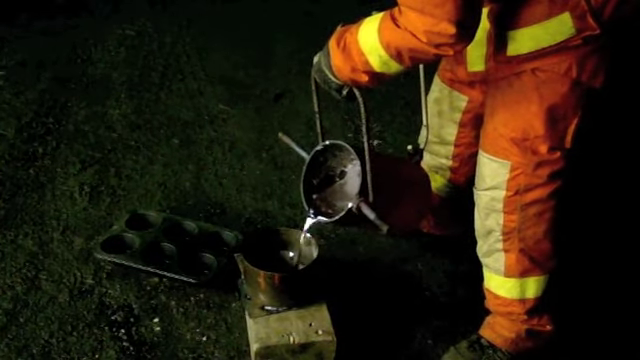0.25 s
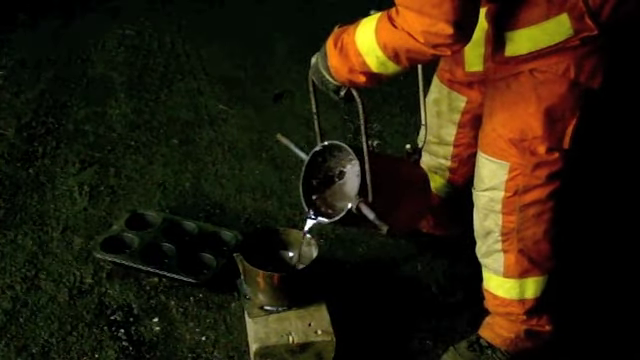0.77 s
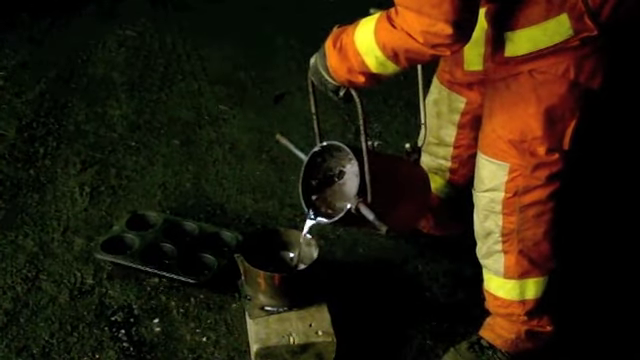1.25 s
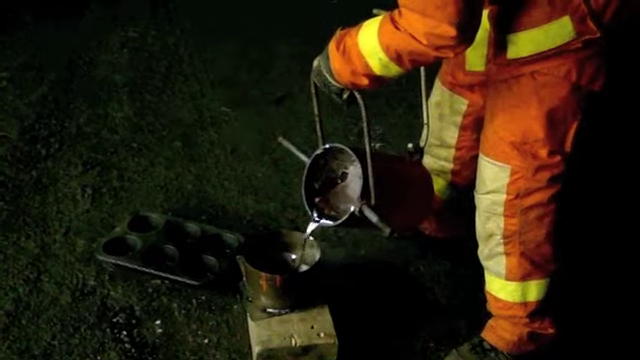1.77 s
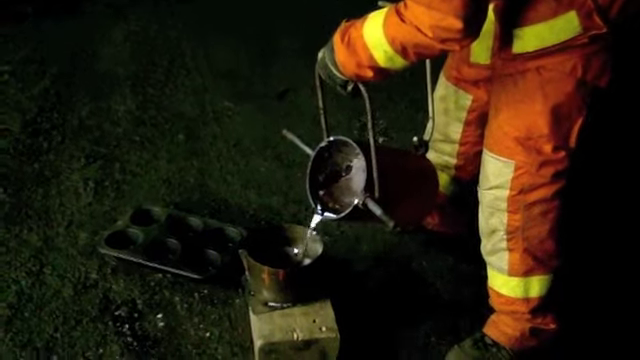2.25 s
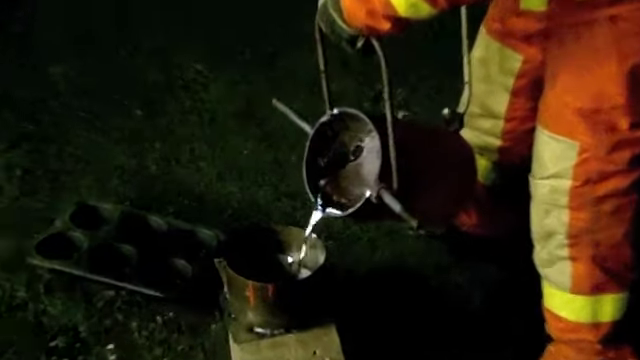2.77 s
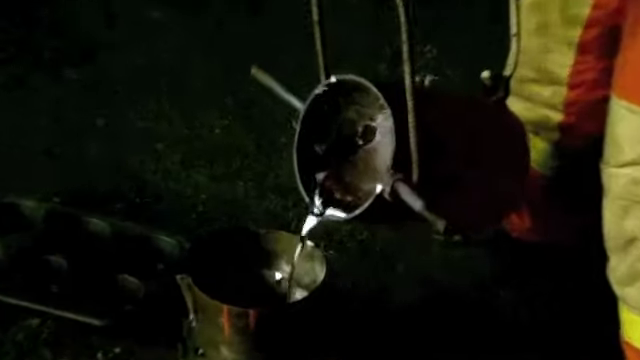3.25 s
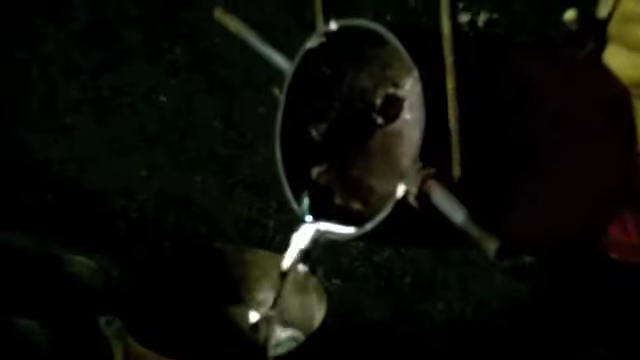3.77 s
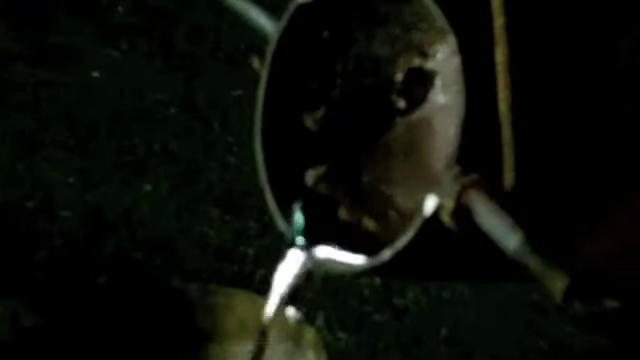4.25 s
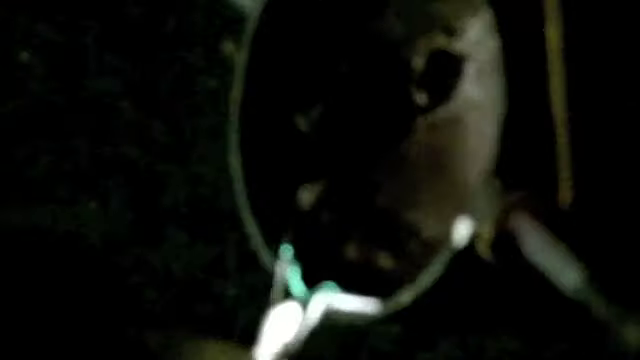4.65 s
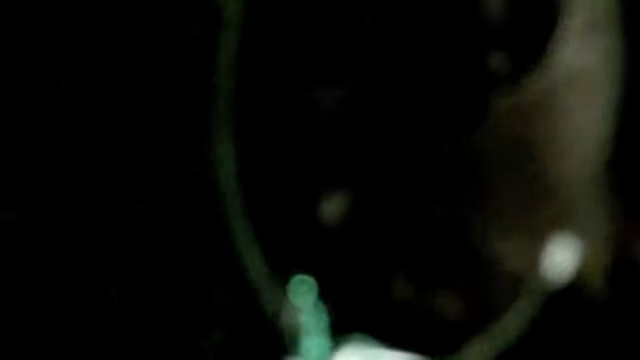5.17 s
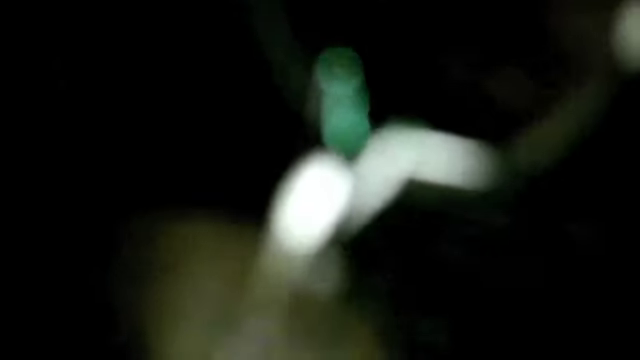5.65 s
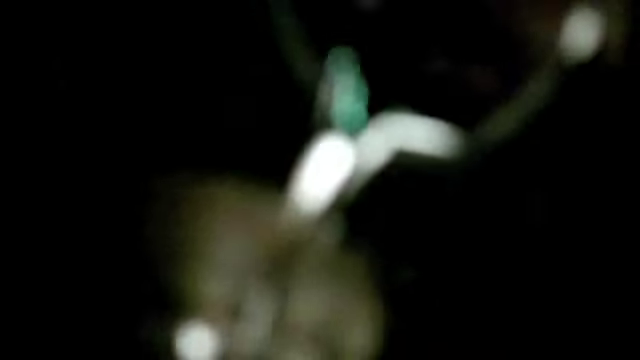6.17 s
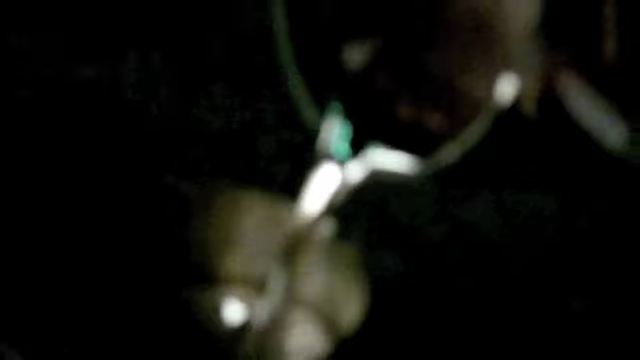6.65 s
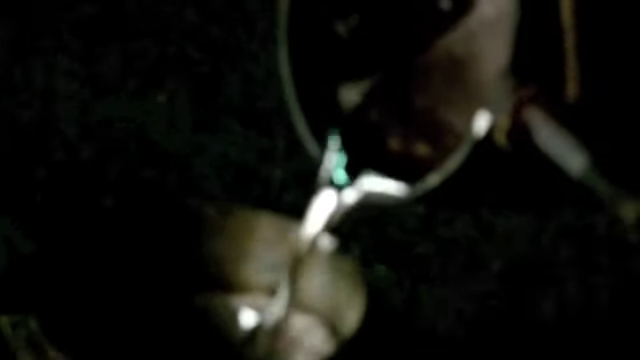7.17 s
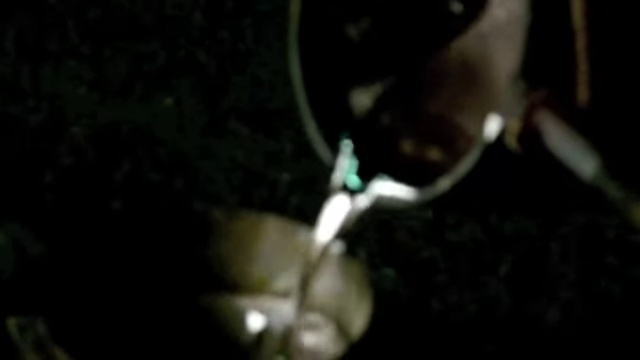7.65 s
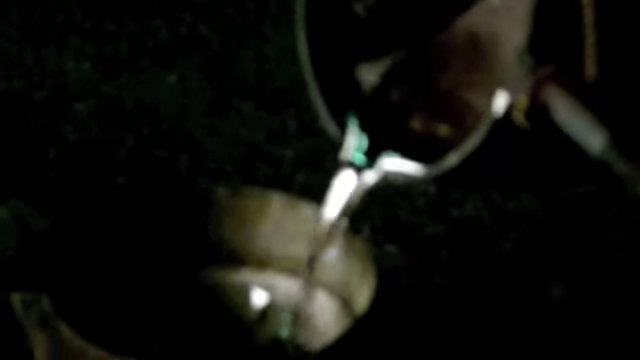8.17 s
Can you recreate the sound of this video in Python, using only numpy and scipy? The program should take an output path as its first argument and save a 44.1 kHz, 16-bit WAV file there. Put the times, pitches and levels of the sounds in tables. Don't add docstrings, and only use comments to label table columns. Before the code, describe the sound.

Outdoor night pour: hissing, spitting liquid metal filling a can, popping snaps, a clattering metal clank partway through, distant road hum behind.

```python
import sys
import numpy as np
from scipy import signal
from scipy.io import wavfile
from scipy.ndimage import uniform_filter1d, minimum_filter1d

SR = 44100
rng = np.random.default_rng(int(sys.argv[2]) if len(sys.argv) > 2 else 0)


def to_linear_factor(level_db):
    exponent = np.asarray(level_db, float) / 20
    return 10 ** exponent


def transcribe(signal):
    frames = np.atleast_2d(signal).T
    limited = np.clip(frames, -1, 1)
    pcm = np.round(limited * 32767).astype(np.int16)
    wavfile.write(sys.argv[1], SR, pcm)


N = 371322

# frequency in Hz, level in dB per Hz.
STEAM_SPECTRUM = [(180, -48.5), (300, -16.5), (475, -19), (602, -11), (2130, -11.5), (3220, -3.5),
                  (3630, -7), (6570, -3), (9660, -2), (10400, -11.5), (13500, -41), (22000, -120)]


def evened(x):
    return x / np.sqrt(np.mean(x ** 2) + 1e-20)


def read(points, hz):
    f, value = np.transpose(points)
    return np.interp(np.log(hz + 1), np.log(f + 1), value)


def curve(rows, column):
    rows = np.asarray(rows)
    return np.interp(np.arange(N) / SR, rows[:, 0], rows[:, column])


def add(mix, s, sound):
    part = mix[round(s * SR):][:len(sound)]
    part += sound[:len(part)]


def coloured(x, db_of):
    gain_db = np.maximum(db_of(abs(np.fft.fftfreq(4096, 1 / SR))), -100)
    log_gain = np.log(to_linear_factor(gain_db))
    taps = np.fft.ifft(np.exp(np.conj(signal.hilbert(log_gain)))).real[:2048]
    return signal.oaconvolve(x, taps)[:len(x)]


def ring(modes, stretch=0.81, spread=0.026):
    t = np.arange(SR // 4) / SR
    off = rng.uniform(-0.4, 1, (len(modes), 2))
    out = np.zeros(len(t))
    for (hz, db, t60_s), (detune, lift) in zip(modes, off):
        decay = to_linear_factor(db + 0.83 * lift - 60 * t / max(t60_s * stretch, 0.004))
        out += decay * np.sin(2 * np.pi * hz * (1 + spread * detune) * t)
    out = out * (1 - np.exp(-t / 0.0018))
    return out / abs(out).max()


def burst(t60_s, rise_s):
    t = np.arange(SR // 4) / SR
    fall = to_linear_factor(-60 * t / max(t60_s, 0.003))
    return rng.standard_normal(len(t)) * fall * (1 - np.exp(-t / rise_s))


def patchy(x, patchy_db, flicker_db, flicker_hz):
    hz, t, z = signal.stft(x, SR, nperseg=256, noverlap=192)
    patches = uniform_filter1d(rng.standard_normal(z.shape), size=5, axis=0)
    patches = uniform_filter1d(patches, size=24, axis=1)
    flicker = evened(uniform_filter1d(rng.standard_normal(len(t)), size=20))
    field_db = patchy_db * evened(patches) + flicker_db * flicker * (hz / (hz + flicker_hz))[:, None]
    return signal.istft(z * to_linear_factor(field_db), SR, nperseg=256, noverlap=192)[1][:N]


def swells(rows, idle_db):
    t = np.arange(N) / SR
    return to_linear_factor(idle_db) + sum(to_linear_factor(db) * np.exp(-((t - s) / half_s) ** 2) for s, half_s, db in rows)


def traffic_wash():
    # frequency in Hz, level in dB per Hz.
    wash_spectrum = [(12, -60.5), (20, -8.5), (87, -17), (136, -10), (260, -7), (339, -5.5), (489, -1),
                     (612, -3), (978, -2), (1200, -3.5), (1500, -5), (2160, -9.5), (2600, -25), (3380, -20),
                     (5720, -120)]
    # time in seconds, level in dB.
    wash_level = [(0.0, -61), (0.3, -58), (2.0, -58), (2.7, -54.5), (3.5, -54), (5.3, -54), (5.7, -56),
                  (6.6, -55), (6.85, -52), (7.0, -56), (7.75, -58), (8.42, -55.5)]
    noise = coloured(rng.standard_normal(N), lambda hz: read(wash_spectrum, hz))
    wash = evened(patchy(noise, patchy_db=1.33, flicker_db=0.88, flicker_hz=300))
    return to_linear_factor(curve(wash_level, column=1) + 0.5) * wash


def engine_hum():
    # middle in seconds, half length in seconds, level in dB.
    pushes = [
        (0.28, 0.1, -72),
        (2.55, 0.2, -92),
        (3.5, 0.44, -70),
        (4.1, 0.087, -72),
        (4.62, 0.26, -69.5),
        (5.05, 0.088, -73),
        (5.42, 0.086, -68),
        (6.65, 0.28, -68),
        (8.2, 0.11, -73),
    ]
    hum_hz, hum_width_hz = 140, 3.0
    waver = uniform_filter1d(rng.standard_normal(N), size=4000)
    waver = evened(uniform_filter1d(waver, size=4000))
    hum = np.sqrt(2) * np.sin(2 * np.pi * np.cumsum(hum_hz + hum_width_hz * waver) / SR)
    return to_linear_factor(-4.0) * swells(pushes, idle_db=-84) * hum


def vehicle_drone():
    # middle in seconds, half length in seconds, level in dB.
    passes = [
        (0.0, 0.2, -68),
        (1.5, .4, -72.5),
        (2.65, 0.28, -65.5),
        (3.5, 0.62, -60),
        (5.2, 0.33, -73),
        (6.2, .45, -64.5),
    ]
    band = signal.butter(2, (169, 272), "band", fs=SR, output="sos")
    drone = evened(signal.sosfilt(band, rng.standard_normal(N)))
    return to_linear_factor(-5.0) * swells(passes, idle_db=-78.5) * drone


def yard():
    return traffic_wash() + engine_hum() + vehicle_drone()


def clank():
    # start in seconds, peak in dB, share of low ring, rattle t60 in seconds, treble in dB.
    contacts = [(3.286, -31.5, 0.26, 0.15, -4), (3.299, -26.5, 0.76, .09, -9), (3.304, -26, 0.3, 0.089, 0),
                (3.3168, -15.5, 0.3, 0.028, -4), (3.324, -29.5, 2.5, 0.078, -11),
                (3.3383, -12, 0.2, 0.028, 8), (3.349, -24, 0.2, 0.16, 4.5), (3.372, -31, 0.077, 0.16, 2),
                (3.393, -36, 0.56, 0.29, 5), (3.411, -39, 0.44, 0.24, 12), (3.44, -37.5, 0.97, 0.31, 11),
                (7.8065, -26.5, .02, 0.042, -7.5), (7.185, -41, .02, 0.099, -12),
                (7.825, -41.5, .02, 0.2, -7), (7.86, -43, .02, 0.28, -11)]
    # frequency in Hz, level in dB, t60 in seconds.
    steel_modes = [(433, 4, 0.16), (418, -7, 0.093), (644, -1, 0.085), (993, 9.5, 0.031)]
    # frequency in Hz, level in dB per Hz.
    rattle_spectrum = [(300, -60.5), (600, 7.5), (950, 5.5), (1300, -0.5), (1850, 8), (2600, 5),
                       (3300, 5.5), (4200, 8.5), (4800, 8), (5500, -5.5), (7000, 0), (8200, -20),
                       (10500, -24)]
    out = np.zeros(N)
    for s, db, low, t60_s, treble_db in contacts:
        shake = burst(t60_s, rise_s=0.002)
        rattle = coloured(shake, lambda f: read(rattle_spectrum, f) + treble_db * np.clip(f / 1500 - 1.4, 0, 1))
        add(out, s, to_linear_factor(db) * (low * ring(steel_modes, spread=0.0025) + rattle / abs(rattle).max()))
    return out


def knock(modes_db):
    # frequency in Hz, t60 in seconds.
    can_modes = [(340, 0.045), (605, 0.056), (1055, 0.064), (1500, 0.05)]
    balance = [(hz, db) for (hz, _), db in zip(can_modes, modes_db)]
    thud_spectrum = [(130, -45)] + balance + [(2200, modes_db[-1] - 5), (3500, -45)]
    thud = coloured(burst(0.022, rise_s=0.0015), lambda f: read(thud_spectrum, f))
    rings = ring([(hz, db, t60_s) for (hz, t60_s), db in zip(can_modes, modes_db)], spread=0.06)
    out = rings + 1.1 * thud / abs(thud).max()
    return out / abs(out).max()


def slugs():
    # start in seconds, peak in dB, belly in dB, shoulder in dB, rim in dB.
    blows = [(0.385, -33.5, -9, -8, -7), (0.62, -28, -19, -1, -8), (0.859, -36.5, -18, 5, -8),
             (1.122, -36.5, 1, -0.5, -4), (1.34, -32, -16, -3, -5), (1.731, -33, -14, 2, 8),
             (1.799, -38.5, -12, -1, 11), (1.85, -37.5, -4, -19, 3), (1.98, -36.5, 1, -7, -1),
             (2.11, -34, -9, -11, -5), (2.231, -31, -38, -7.5, -9), (2.345, -26.5, -20, -6, -9),
             (2.376, -34, -10, -9, -6), (2.598, -32, 0, 3.5, 0.5), (2.711, -36, -5, -3, 0),
             (2.947, -37.5, -19, -10, 0), (3.534, -37.5, 5, 8, -2), (3.598, -30.5, -18, -2, -1),
             (3.785, -39, -11, -7, 2), (4.617, -34.5, 1, -2, 0), (5.848, -40.5, 5, 6, -6),
             (7.183, -45, 5, 24, 15), (7.806, -26.5, -32, 2.5, -2), (8.342, -39.5, 5, -7, -14)]
    wall_db = -9
    out = np.zeros(N)
    for s, db, belly_db, shoulder_db, rim_db in blows:
        add(out, s, to_linear_factor(db) * knock(wall_db + np.array([belly_db, 0, shoulder_db, rim_db])))
    return out


def snaps():
    # start in seconds, peak in dB, centre in Hz, width in octaves.
    pockets = [(0.5113, -20, 6500, 1.9), (0.6489, -23, 3950, 1.8), (0.7799, -34, 6460, 1.3),
               (0.869, -22, 8120, 0.98), (1.34, -16.5, 5600, 1.1), (1.6944, -20.5, 9600, 0.72),
               (1.731, -17, 8490, 1.4), (1.8002, -26, 3600, 1.2), (1.8543, -19.5, 4600, 2.2),
               (2.2302, -15.5, 9300, 0.71), (2.2593, -24, 6290, 1.7), (2.2883, -25.5, 3210, 1.8),
               (3.5971, -30, 4080, 0.61), (3.7867, -22.5, 8130, 1.2), (3.8041, -27, 3140, 0.93),
               (4.5789, -29, 4480, 2), (5.552, -25, 4330, 2.2), (5.7268, -17, 10000, 0.91),
               (5.8665, -29, 4650, 1.3), (6.2401, -28, 6860, 1.6), (6.7684, -23, 4650, 2.4),
               (7.0138, -25, 7990, 1.9), (7.1855, -23.5, 8450, 0.82), (7.298, -28, 7220, 2.9),
               (7.5232, -29, 9080, 1), (7.806, -13.5, 9170, 1.15), (7.8065, -20.5, 4500, 1.6),
               (7.826, -20, 9600, 1.6), (7.9634, -17, 6200, 2.1), (8.3294, -28, 4120, 1.1)]
    out = np.zeros(N)
    for s, db, hz, octaves in pockets:
        puff = burst(0.014, rise_s=0.0015)
        snap = coloured(puff, lambda f: -12 * (np.log2((f + 1) / hz) / octaves) ** 2)
        add(out, s, to_linear_factor(db - 4.0) * snap / abs(snap).max())
    return out


def spits():
    # start in seconds, peak in dB.
    spit_rows = [(0.0747, -21), (0.1294, -30), (0.3197, -24), (0.3744, -26), (0.6044, -28), (0.7044, -26),
                 (0.7794, -26), (0.8394, -27), (0.8474, -25), (0.8994, -28), (1.0194, -28), (1.0744, -28),
                 (1.1544, -28), (1.4244, -25), (1.4594, -27), (1.7988, -26), (1.8114, -28), (1.9094, -29),
                 (2.3445, -26), (2.376, -27)]
    out = np.zeros(N)
    for s, db in spit_rows:
        spit = coloured(burst(0.003, rise_s=0.0001), lambda f: read(STEAM_SPECTRUM, f))
        add(out, s, to_linear_factor(db) * spit / abs(spit).max())
    return out


def hits():
    out = slugs() + snaps() + spits() + clank()
    scatter = burst(0.36, rise_s=0.0074)
    return out + to_linear_factor(-15.5) * signal.oaconvolve(out, scatter / np.linalg.norm(scatter))[:N]


def sizzle(per_s=2500, spread_db=1.5, grains_db=-5.5):
    # time in seconds, sizzle strength in dB, brightness in dB.
    pour = [(0.0, -42, -3), (2.91, -46, -4), (3.4, -44.5, -2), (4.29, -47, -5), (5.37, -47.5, -5),
            (5.56, -49.5, -2), (5.75, -50, -3), (6.17, -48.5, -5), (6.82, -51, -0.5), (6.99, -53, 0.5),
            (7.34, -54.5, -1.5), (7.88, -52, -2), (8.09, -54, -2.5), (8.42, -51.5, -2)]
    # frequency in Hz, width in Hz, lift empty in dB, lift full in dB.
    hollow = [(620, 180, 0.5, 3.5), (1060, 250, -2.5, 3), (1585, 184, 9, 7), (2355, 140, 8, 4),
              (2170, 110, 2.5, -8), (3144, 530, 2, 3.5), (3950, 415, 8, 3), (3560, 230, -7, 0.5),
              (4670, 570, 2.5, 6), (5530, 450, 3, 4.5), (6650, 870, 5.5, 3.5), (8120, 300, 1, 1.5),
              (9960, 480, 5, 3.5)]
    # time in seconds, fullness 0-1.
    filling = [
        (0, 0.4),
        (2.5, 0.67),
        (4.5, 1),
        (8.42, 0.85),
    ]

    size = to_linear_factor(spread_db * np.minimum(rng.exponential(1, N), 6)) * (rng.random(N) < per_s / SR)
    grains = np.convolve(size, np.exp(-np.arange(60) / 12.0))[:N] * rng.standard_normal(N)
    hiss = rng.standard_normal(N)
    drive = patchy(hiss + to_linear_factor(grains_db) * evened(grains), patchy_db=0.82, flicker_db=0.38, flicker_hz=5200)

    def in_can(column):
        def level_db(hz):
            lift_db = sum(m[column] * np.exp(-2 * ((hz - m[0]) / m[1]) ** 2) for m in hollow)
            return read(STEAM_SPECTRUM, hz) + lift_db
        return evened(coloured(drive, level_db))

    empty, full = in_can(2), in_can(3)
    fill = np.clip(curve(filling, column=1), 0, 1)
    x = (1 - fill) * empty + fill * full
    top = signal.sosfiltfilt(signal.butter(2, 5200, "high", fs=SR, output="sos"), x)
    brightness = to_linear_factor(curve(pour, column=2)) - 1
    return to_linear_factor(curve(pour, column=1) + 4.0) * (x + brightness * top)


def scene():
    return np.tile(yard() + hits() + sizzle(), (2, 1))


def starved(z, hz):
    ahead_db, behind_db = 14, 10
    before_loss_db, after_loss_db, starve_hz = 36, 13, 4300
    power = uniform_filter1d(abs(z[0]) ** 2, size=9, axis=0)
    level_db = 10 * np.log10(uniform_filter1d(power, size=3, axis=1) + 1e-20)
    base_db = np.maximum(level_db, uniform_filter1d(level_db, size=201, axis=1))
    heard = (hz > 500) & (hz < 10000)
    coming_db = -minimum_filter1d(-level_db[heard].mean(0), size=23, origin=-11)
    past_db = -minimum_filter1d(-level_db, size=15, axis=1, origin=7)
    before = np.clip((coming_db - base_db[heard].mean(0) - ahead_db) / 3, 0, 1)
    after = np.clip((past_db - base_db - behind_db) / 3, 0, 1)
    reach = np.clip(hz / starve_hz - 0.3, 0, 1)[:, None]
    return reach * (before_loss_db * before + after_loss_db * after)


def dropouts(hz, t):
    shape = (len(hz) // 3 + 1, len(t) // 5 + 1)
    chance = rng.random(shape) / rng.exponential(1, shape[1]) ** 0.8
    cells = np.kron(chance, np.ones((3, 5)))[:len(hz), :len(t)]
    return 20 * (cells < 0.14 * np.clip(hz / 800 - 5.4, 0, 1)[:, None])


def roll_off(x):
    return signal.sosfilt(signal.butter(12, 11250, fs=SR, output="sos"), x)


def record(dry):
    hz, t, z = signal.stft(dry, SR, nperseg=256, noverlap=192)
    loss_db = starved(z, hz) + dropouts(hz, t)
    x = signal.istft(z * to_linear_factor(-loss_db), SR, nperseg=256, noverlap=192)[1][:, :N]
    x = signal.sosfilt(signal.butter(2, 60, "high", fs=SR, output="sos"), x)
    self_noise = to_linear_factor(-63) * rng.standard_normal(N)
    x = x + signal.sosfilt(signal.butter(1, 60, fs=SR, output="sos"), self_noise)
    band_limit = signal.firwin(601, 10067, window=("kaiser", 8), fs=SR)
    x = signal.oaconvolve(x, band_limit[None], "same")
    return roll_off(x)


dry = scene()
out = record(dry)
transcribe(out)
```